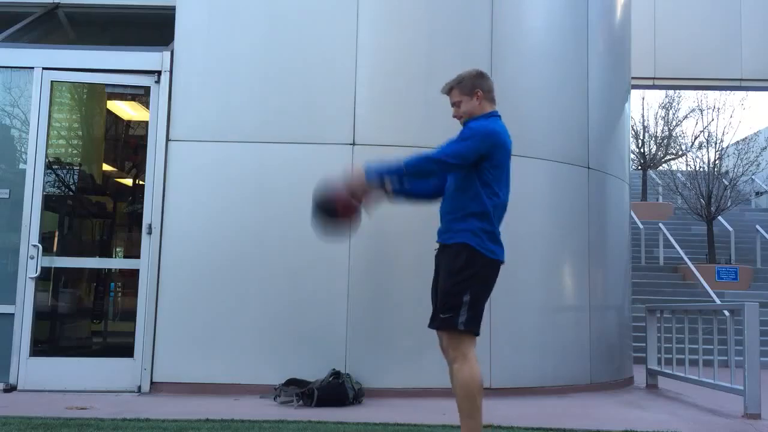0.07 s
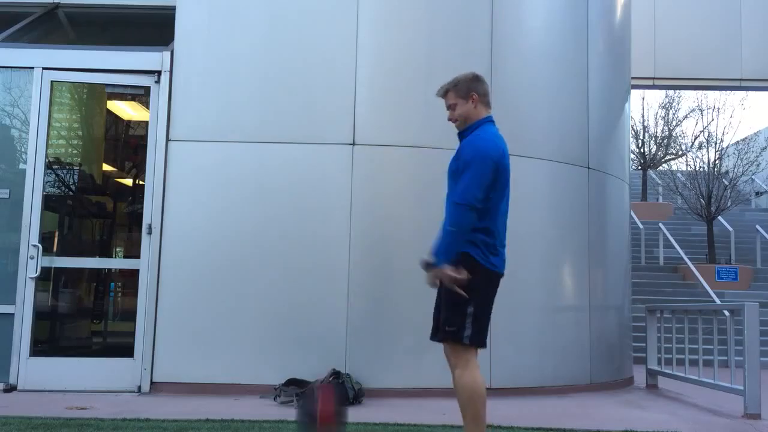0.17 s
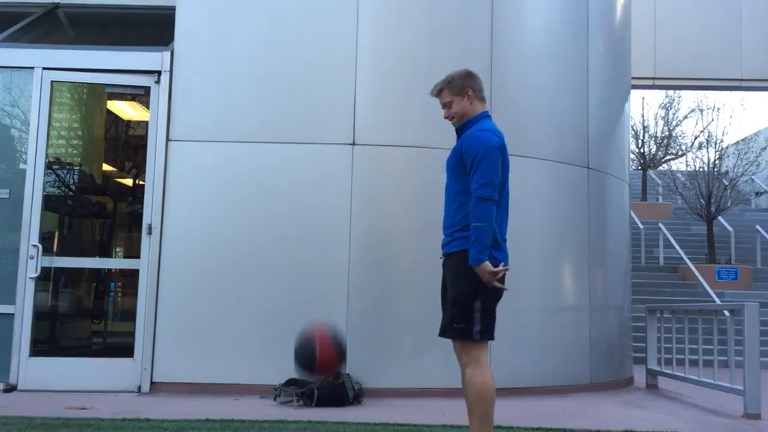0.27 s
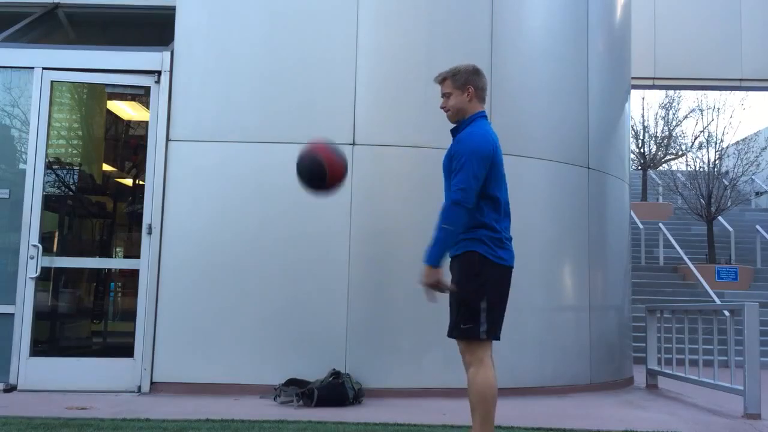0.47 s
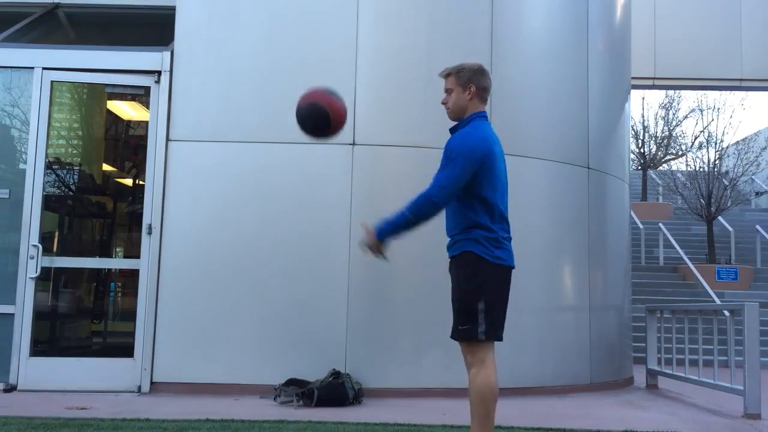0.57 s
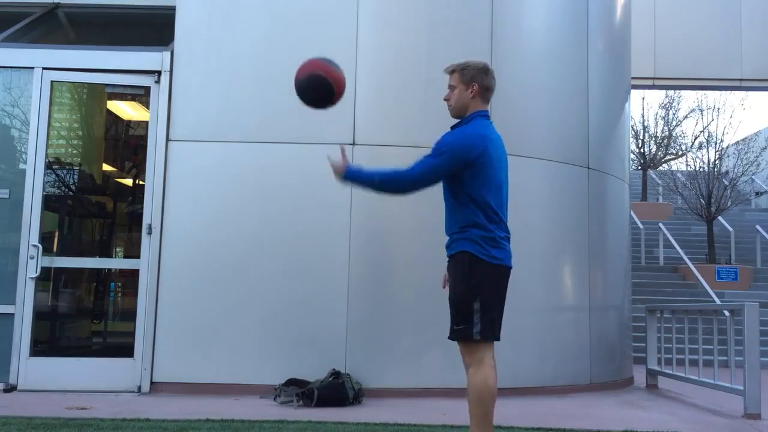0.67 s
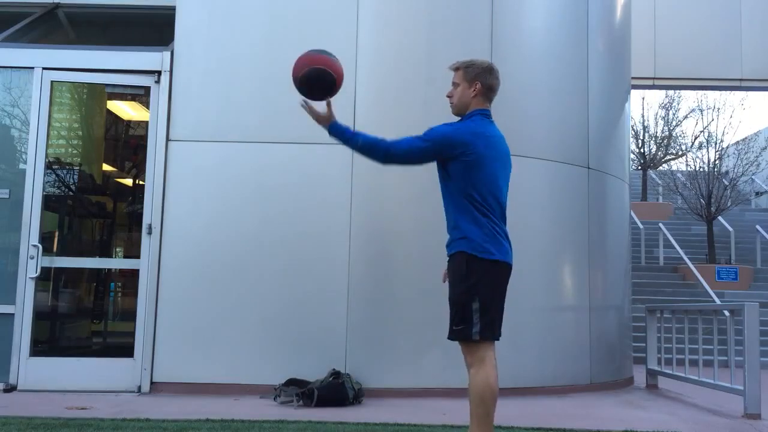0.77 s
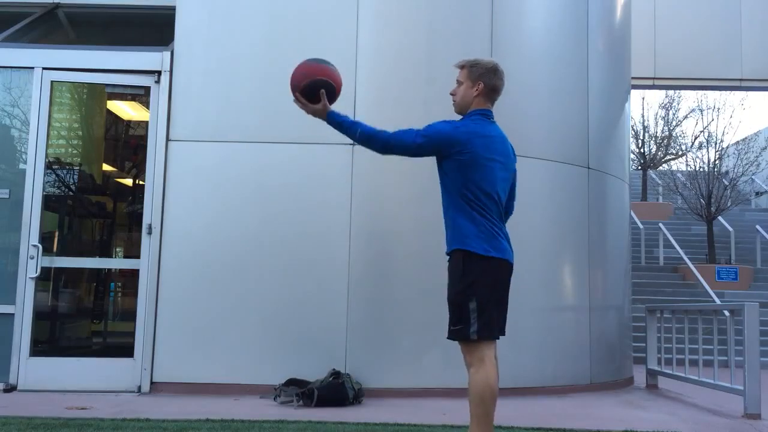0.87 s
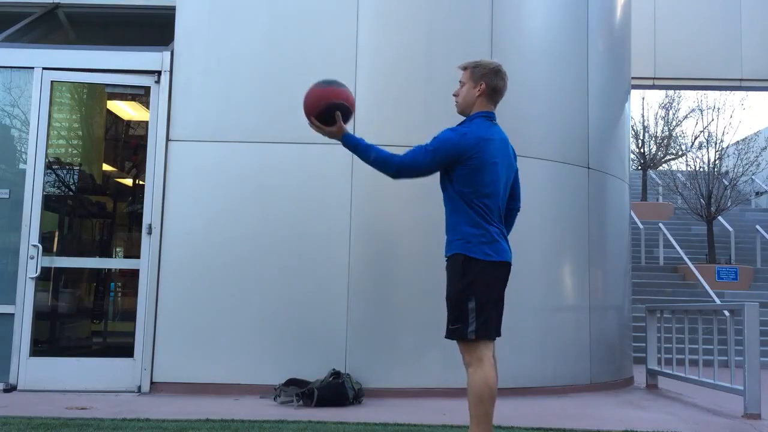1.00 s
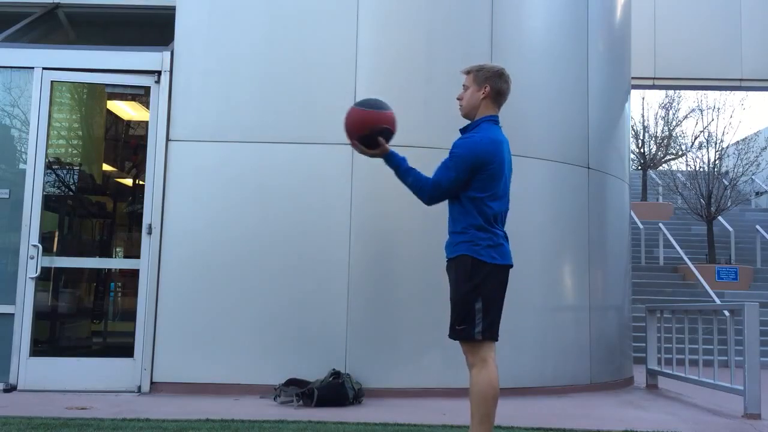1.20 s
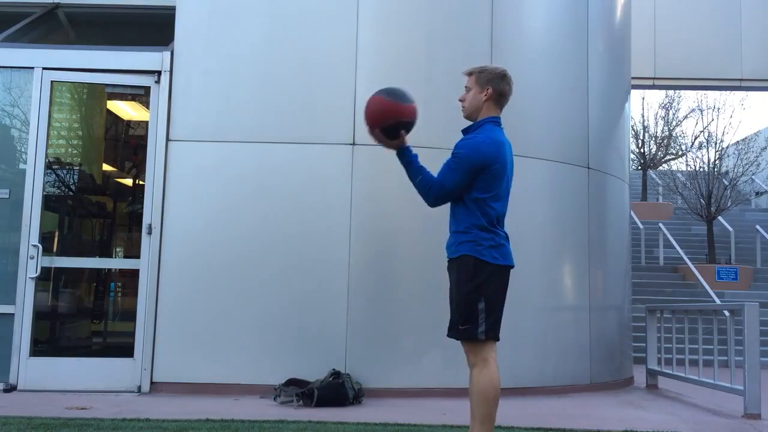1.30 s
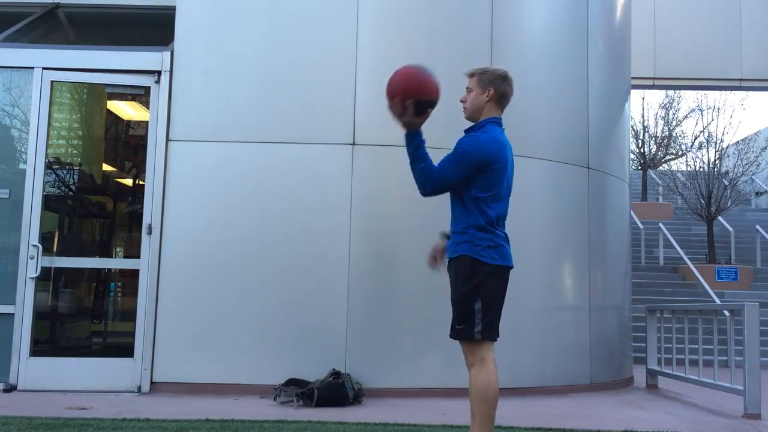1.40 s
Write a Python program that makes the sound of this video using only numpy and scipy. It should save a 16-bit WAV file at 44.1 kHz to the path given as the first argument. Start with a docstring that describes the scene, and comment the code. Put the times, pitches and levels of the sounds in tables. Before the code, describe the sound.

A heavy medicine ball slams onto artificial turf at about 0.4 seconds, close by: one sharp slap and low thud with a slight crunch and a brief echo off a building. Soft hand pats on the ball come at about 0.1, 0.9 and 1.3 seconds, with very faint clothing rustle. Distant traffic rumble and a low, wavering machine hum lie underneath throughout.

```python
"""Outdoors on artificial turf, in front of a building; distant traffic and a machine hum lie underneath.
Near the microphone a hand pats a heavy rubber medicine ball and sleeves swish as it is slammed down once.
The turf crunches, the ball slaps and booms ever lower as it flattens, and the wall and yard answer.
The recorder's gain ducks at the blow and creeps back while the jacket rustles, the hand pats
the ball again and faint whistles sound far away."""
import sys
import numpy as np
from scipy import signal
from scipy.fft import rfft, irfft, next_fast_len
from scipy.io import wavfile
from scipy.ndimage import uniform_filter1d, map_coordinates

SR = 44100
rng = np.random.default_rng(int(sys.argv[2]) if len(sys.argv) > 2 else 0)


def master_out(mix):
    """Clip the mix to full scale and print it as 16-bit PCM to the path in sys.argv[1]."""
    frames = np.transpose(np.atleast_2d(mix))
    ceiling = np.clip(frames, -1, 1)
    pcm = np.round(ceiling * 32767).astype(np.int16)
    wavfile.write(sys.argv[1], SR, pcm)


N = 63945

SLAM_S = 0.3728  # the ball's skin meets the ground

# the ball's modes, slap to boom (delay [s], pitch [Hz], level [dB], swell [s], t60 [s])
BALL_MODES = [(0.0, 1325, -10.5, 0.0002, 0.0055), (0.0002, 1123, -27, 0.00044, 0.0041),
              (0.0003, 677, -24, 0.00043, 0.02), (0.0005, 385, -1, 0.0012, 0.017),
              (0.0016, 64, 1, .012, 0.1), (0.008, 145.4, -6, .001, 0.042)]
# blades of turf crushed under the ball (frequency [Hz], level [dB])
TURF_SPECTRUM = [(400, -15), (850, -14), (1300, 4), (2200, -2.5), (3000, -18.5), (4500, -5.5),
                 (5700, -15.5), (6300, -14.5), (9000, -5.5), (10500, -16.5), (13000, -6), (16000, -12)]
# sharp resonances in the crunch (frequency [Hz], width [Hz], level [dB])
TURF_RESONANCES = [(2420, 154, 2.5), (5200, 150, -2.5), (6120, 175, 0.5), (6900, 110, -5), (8930, 270, -2),
                   (12600, 140, -6)]
# early echoes off the building (delay [s], level [dB])
WALL_ECHOES = [(0.0169, -11), (0.021, -12), (0.026, -20.5)]
# tone of those echoes (frequency [Hz], level [dB])
WALL_SPECTRUM = [(100, -18.5), (300, -1.5), (600, 3), (1200, -3), (2100, 3), (3000, 2), (5000, -17),
                 (14000, -16)]
# the yard's diffuse tail (frequency [Hz], level [dB])
YARD_SPECTRUM = [(60, -8), (400, -6.5), (850, -8), (1500, 0), (5000, 0.5), (14000, -2)]
# sleeves on the way down (time [s], half length [s], level [dB])
SLEEVE_SWISHES = [(.254, 0.017, -73.5), (.263, 0.0016, -70), (.272, 0.0018, -66), (.304, 0.013, -69.5)]
# their bright hiss (frequency [Hz], level [dB])
SLEEVE_SPECTRUM = [(2000, -23), (5000, -7), (8000, -5), (10500, -7), (14000, 1.5), (16000, -4.5)]
# the jacket as the arms come back (time [s], half length [s], level [dB])
JACKET_RUSTLES = [(.63, 0.043, -67), (.758, 0.0087, -65), (.91, 0.047, -63.5), (1.12, 0.023, -63.5)]
# its duller tone (frequency [Hz], level [dB])
JACKET_SPECTRUM = [(600, -20), (1500, -6), (2250, 5.5), (2900, -13), (4000, -17), (14000, -40)]
# the hand on the ball (time [s], level [dB])
HAND_PATS = [(0.116, -45.5), (0.87, -40), (0.919, -43), (1.342, -42.5)]
# tone of a soft pat (frequency [Hz], level [dB])
PAT_SPECTRUM = [(100, -17), (600, -13), (900, 7), (1150, -8), (1650, -10), (2600, -24), (10000, -57)]
# rumble of distant traffic (frequency [Hz], level [dB])
RUMBLE_SPECTRUM = [(22, -9.5), (32, -11), (42, -5.5), (52, 3), (66, -2.5), (100, 0), (160, -2), (215, -3),
                   (290, -8), (420, -17), (560, -24.5), (900, -29), (1600, -45), (3000, -51), (5000, -60),
                   (6500, -57.5), (10000, -62), (15500, -65.5)]
# tyres on the road (frequency [Hz], level [dB])
TYRE_SPECTRUM = [(200, -14), (500, 3), (700, 2), (1000, 0), (1700, -6.5), (2400, -15.5), (3200, -24),
                 (6000, -35.5), (15000, -55)]
# their rise and fall (time [s], level [dB])
TYRE_LEVELS = [(0, -55.5), (.33, -53.5), (.48, -54), (.58, -53.5), (.75, -53), (.9, -51), (1.0, -51.5),
               (1.13, -53.5), (1.45, -53.5)]
# their bounces off the ground and the building (delay [s], level [dB])
TYRE_BOUNCES = [(.0037, -25), (.0082, -11), (0.0173, -16.5)]
# the machine hum comes and goes (time [s], level [dB])
HUM_LEVELS = [(0, -44), (.2, -41), (.35, -48.5), (.5, -52.5), (.62, -37.5), (.69, -45), (.77, -36),
              (.92, -37.5), (1.0, -54.5), (1.45, -49)]
# faint whistles far away (time [s], half length [s], level [dB])
FAR_WHISTLES = [(.915, 0.025, -76), (1.105, 0.02, -74.5), (1.165, 0.021, -76.5)]
# their narrow, high band (frequency [Hz], level [dB])
WHISTLE_SPECTRUM = [(4500, -43), (5900, -9.5), (6300, -2), (6700, -18), (8500, -23)]


def ball():
    """Close up: slap, knock and boom, damped modes that follow one another as the ball flattens."""
    sound = np.zeros(N)
    for delay, hz, db, swell, t60 in BALL_MODES:
        start = SLAM_S + delay
        sound += amp(db) * fade(start, swell, t60) * np.sin(2 * np.pi * hz * (clock() - start))
    return sound


def turf():
    """Dense tiny snaps of the blades, from just before the ball lands until it lies flat."""
    snaps_per_s, rise_s, rise_db = 22000, 0.0035, 11
    flat_s, crunch_t60, release_t60 = 0.012, 0.042, 0.01
    snaps = rng.standard_normal((2, N)) * (rng.random((2, N)) < snaps_per_s / SR)
    crunch = unit(coloured(snaps[0], TURF_SPECTRUM))
    crack = amp(-4) * unit(resonant(snaps[1], TURF_RESONANCES))
    t = clock() - (SLAM_S - rise_s)
    rise = (t > 0) * amp(rise_db * np.minimum(t / rise_s - 1, 0))
    decay = amp(-60 * np.maximum(t - rise_s, 0) / crunch_t60)
    release = amp(-60 * np.maximum(t - flat_s, 0) / release_t60)
    return amp(-35.5) * rise * decay * release * (crunch + crack)


def wall(slam):
    """The building, a few metres off, throws back three coloured echoes."""
    return coloured(copies(slam, WALL_ECHOES), WALL_SPECTRUM)


def yard(slam):
    """The yard scatters the slam into a short diffuse tail."""
    tail = rng.standard_normal(N) * fade(start=0.008, swell=0.0014, t60=0.13)
    scattered = signal.fftconvolve(slam, tail / np.linalg.norm(tail))[:N]
    return amp(-12.5) * coloured(scattered, YARD_SPECTRUM)


def thrower():
    """Near the microphone sleeves swish, the jacket rustles and the hand pats the ball."""
    sleeves = swells(SLEEVE_SWISHES) * noise(SLEEVE_SPECTRUM)
    jacket = swells(JACKET_RUSTLES) * noise(JACKET_SPECTRUM)
    pat_envelope = sum(amp(db) * fade(start, swell=0.0013, t60=0.045) for start, db in HAND_PATS)
    return sleeves + jacket + pat_envelope * noise(PAT_SPECTRUM)


def traffic():
    """A distant road: rumble, and tyre noise arriving both direct and off the ground and building."""
    rumble = amp(-37 + 0.33 * wobble(9.6)) * noise(RUMBLE_SPECTRUM)
    direct = noise(TYRE_SPECTRUM)
    tyres = level(TYRE_LEVELS) * unit(direct + copies(direct, TYRE_BOUNCES))
    flutter = amp(0.34 * wobble(24.4))
    return rumble + flutter * tyres


def machine_hum():
    """A machine in the background holds one low, slightly wavering tone."""
    hum_hz, waver_rad = 130.6, 0.4
    phase = 2 * np.pi * hum_hz * clock() + waver_rad * wobble(11.6)
    return level(HUM_LEVELS) * np.sqrt(2) * np.sin(phase)


def whistles():
    """Far away, three faint swells of high, narrow noise."""
    return swells(FAR_WHISTLES) * noise(WHISTLE_SPECTRUM)


def amp(db):
    """Decibels to gain."""
    return 10 ** (np.asarray(db) / 20)


def unit(x):
    """Scale to rms 1."""
    return x / np.sqrt(np.mean(x ** 2) + 1e-20)


def clock():
    """Time of every sample [s]."""
    return np.arange(N) / SR


def level(points):
    """Gain per sample from (time [s], level [dB]) points."""
    return amp(np.interp(clock(), *np.transpose(points)))


def fade(start, swell, t60):
    """Envelope that swells smoothly from start and dies away; all in seconds."""
    t = np.maximum(clock() - start, 0)
    return (1 - np.exp(-t / swell)) ** 2 * amp(-60 * t / t60)


def swells(rows):
    """Sum of bell-shaped envelopes."""
    return sum(amp(db) * np.exp(-((clock() - s) / half) ** 2 / 2) for s, half, db in rows)


def wobble(rate):
    """A smooth random curve, rate knots a second."""
    return map_coordinates(rng.standard_normal(256), [clock() * rate], mode="wrap")


def bin_gains(spectrum, size):
    """Gain per FFT bin from (frequency [Hz], level [dB]) points."""
    hz, db = np.transpose(spectrum)
    return amp(np.interp(np.log(np.fft.rfftfreq(size, 1 / SR) + 1), np.log(hz + 1), db))


def noise(spectrum):
    """Coloured noise of rms 1."""
    return unit(irfft(rfft(rng.standard_normal(N)) * bin_gains(spectrum, N), N))


def coloured(x, spectrum):
    """x through a causal filter with this spectrum."""
    size = 2 * next_fast_len(N)
    cepstrum = irfft(np.log(bin_gains(spectrum, size)), size)
    cepstrum[1:size // 2] *= 2  # fold to minimum phase: nothing rings ahead of the blow
    cepstrum[size // 2 + 1:] = 0
    return irfft(rfft(x, size) * np.exp(rfft(cepstrum)), size)[:N]


def resonant(x, peaks):
    """x through parallel band-pass resonances."""
    size = 2 * next_fast_len(N)
    f = np.fft.rfftfreq(size, 1 / SR)
    response = sum(amp(db) * 1j * f * width / (hz**2 - f**2 + 1j * f * width) for hz, width, db in peaks)
    return irfft(rfft(x, size) * response, size)[:N]


def copies(x, rows):
    """Sum of delayed copies of x, from (delay [s], level [dB]) rows."""
    return sum(amp(db) * np.pad(x, (round(delay * SR), 0))[:N] for delay, db in rows)


def scene():
    """At one microphone: the slam and its echoes, the thrower, and the street beyond."""
    slam = ball() + turf()
    foreground = slam + wall(slam) + yard(slam) + thrower()
    return (foreground + traffic() + machine_hum() + whistles())[None]


def record(dry):
    """The recorder's gain ducks on a loud peak and recovers slowly; deep bass and the top are cut."""
    threshold_db, duck_slope, recover_s = -23, 0.22, 0.22
    low_cut_hz, top_hz = 46, 15800
    power = np.abs(uniform_filter1d(dry[0] ** 2, size=441, origin=220))  # over the last 10 ms
    wanted_duck_db = duck_slope * np.maximum(10 * np.log10(power + 1e-12) - threshold_db, 0)
    recovery = np.exp(-clock() / recover_s)
    duck_db = np.maximum.accumulate(wanted_duck_db / recovery) * recovery
    size = next_fast_len(N + SR // 2)
    f = np.fft.rfftfreq(size, 1 / SR)
    passband = (f < top_hz) / np.sqrt(1 + (low_cut_hz / (f + 1)) ** 8)
    return irfft(rfft(dry * amp(-duck_db), size) * passband, size)[:, :N]


dry = scene()
out = record(dry)
master_out(out)
```